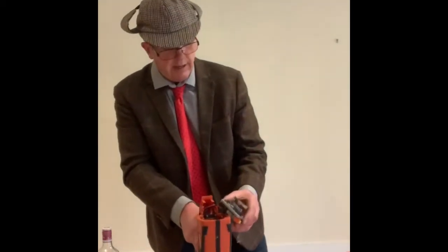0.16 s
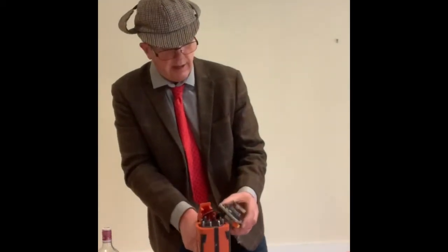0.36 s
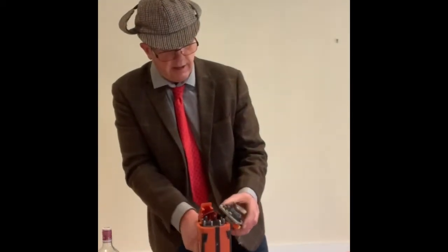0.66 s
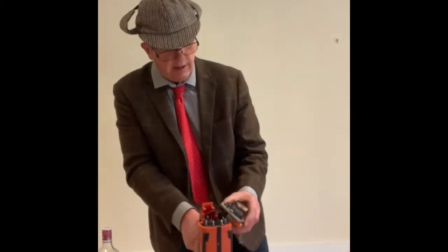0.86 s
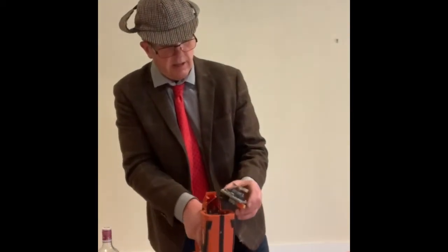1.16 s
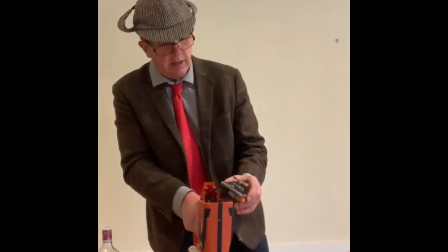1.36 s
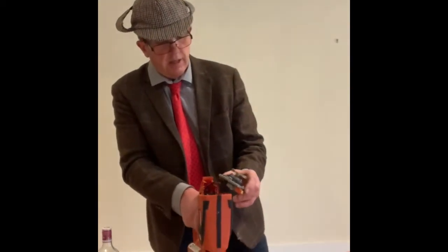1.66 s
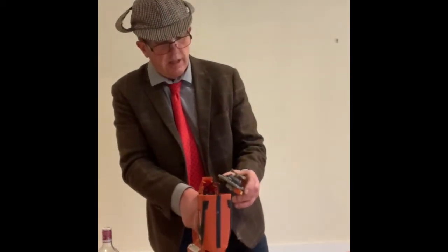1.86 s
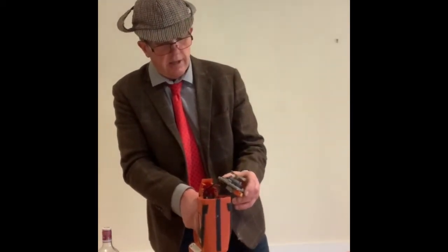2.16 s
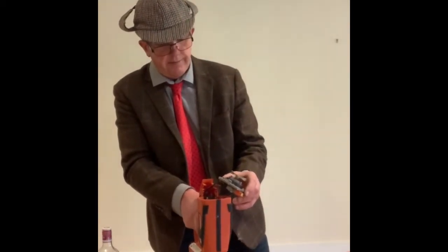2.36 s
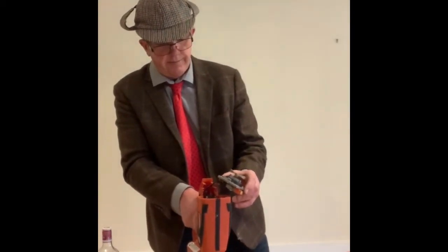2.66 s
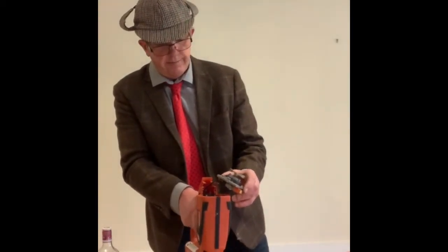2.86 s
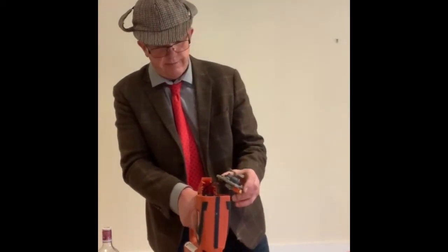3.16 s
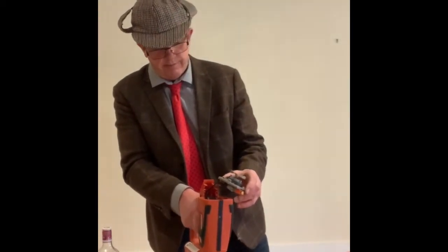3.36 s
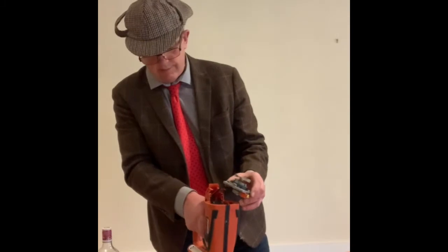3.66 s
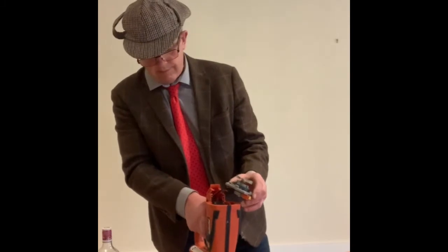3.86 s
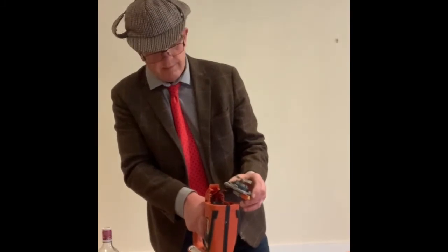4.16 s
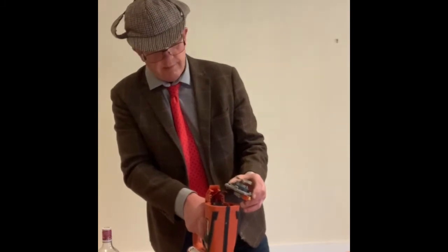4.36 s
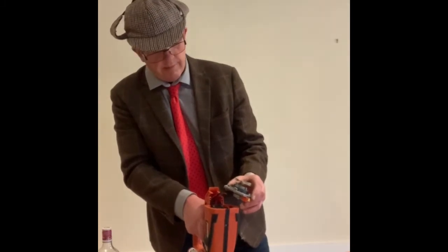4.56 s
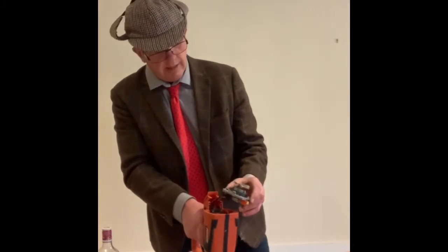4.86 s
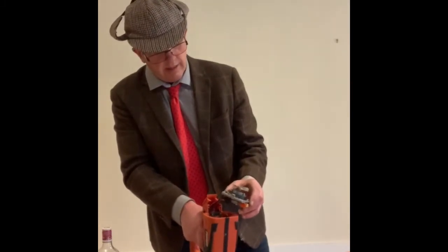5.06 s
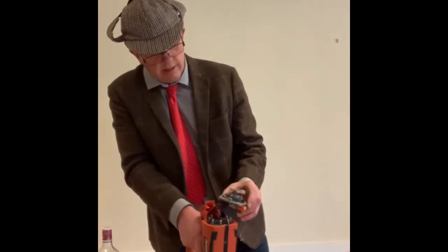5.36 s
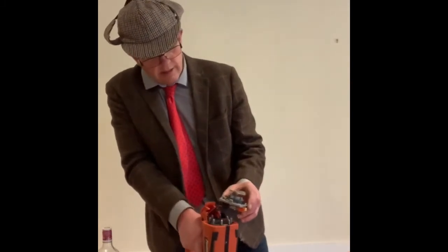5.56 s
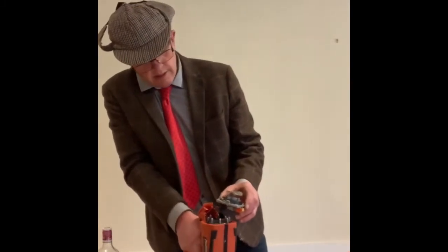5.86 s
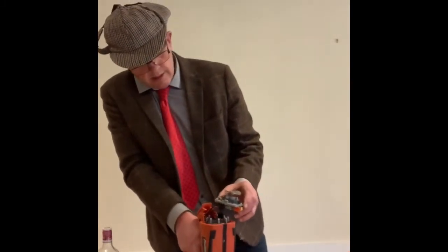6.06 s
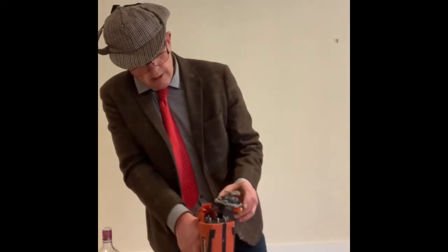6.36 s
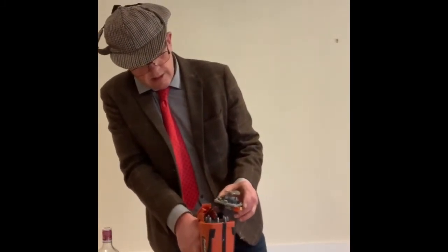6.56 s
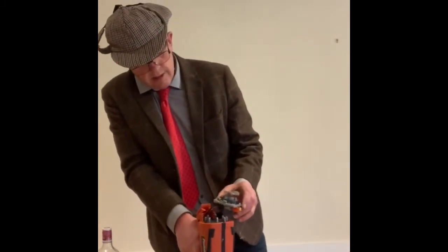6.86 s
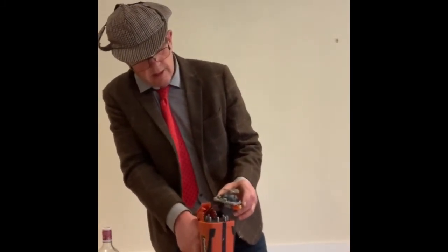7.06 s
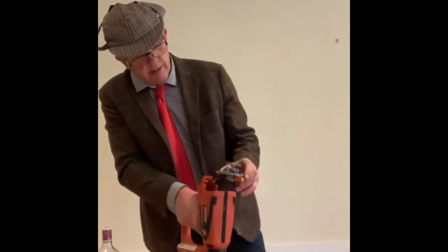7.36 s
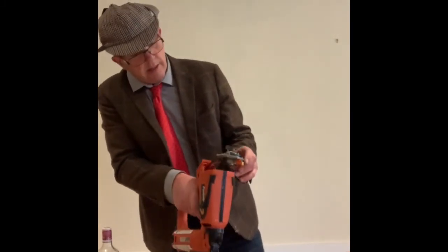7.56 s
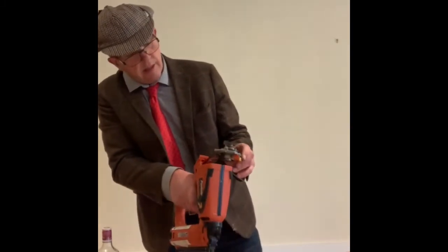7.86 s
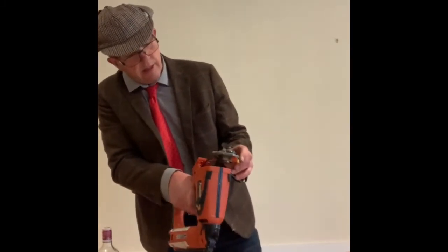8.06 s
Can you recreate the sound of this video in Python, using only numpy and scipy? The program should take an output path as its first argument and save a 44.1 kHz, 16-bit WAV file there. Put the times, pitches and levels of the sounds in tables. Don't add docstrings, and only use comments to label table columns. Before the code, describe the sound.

From the start a small four-bladed fan motor in a nail gun runs at full speed, close by in a quiet, bare room: a steady whine near 790 Hz over a faint low hum, thin higher whistles and a bright airy hiss around 4 kHz. Light handling leads to a hard latch snap and hollow table knock at 0.25 s, then soft drags; another click and knock at 1.0 s, a small click at 2.0 s. The whine wavers in strength. At 4.0 s power is cut and all tones glide down, hiss dulling and fading over 1.4 s. Clicks, scrapes and low table knocks cluster from 4.9 to 5.4 s. At 5.4 s the motor rapidly spins up to a barely lower whine. Faint drags follow, then a sharp burst of latch clicks at 7.15 s; the tone shifts colour as the tool is lifted, still running at 8 s.

```python
import sys
import numpy as np
from scipy import signal
from scipy.fft import irfft
from scipy.io import wavfile
from scipy.ndimage import uniform_filter1d

SR = 44100
rng = np.random.default_rng(int(sys.argv[2]) if len(sys.argv) > 2 else 0)


def invert_db(level):
    return 10 ** (np.asarray(level, dtype=float) / 20)


def master(y):
    cut = np.clip(np.atleast_2d(y).T, -1, 1)
    pcm = np.round(cut * 32767)
    wavfile.write(sys.argv[1], SR, pcm.astype(np.int16))


N = 361619

# frequency [Hz], level [dB].
SPREAD = [(60, -17), (300, -17), (700, -10), (1500, -7), (2600, -7), (4300, -16), (6500, -11), (9000, -14),
          (12000, -12), (15000, -8)]

FULL_SPEED_HZ = 197.3
SWITCH_OFF_S, SWITCH_ON_S = 4.0, 5.408
HOP = 256


def evened(x):
    return x / np.sqrt(np.mean(abs(x) ** 2) + 1e-20)


def read(points, hz):
    f, value = np.transpose(points)
    return np.interp(np.log(hz + 1), np.log(f + 1), value)


def add(mix, s, sound):
    part = mix[..., round(s * SR):][..., :sound.shape[-1]]
    part += sound[..., :part.shape[-1]]


def band(x, low_hz, high_hz):
    sos = signal.butter(2, (low_hz, high_hz), "band", fs=SR, output="sos")
    return signal.sosfiltfilt(sos, x)


def drift(per_s, rows):
    z = rng.standard_normal((rows, N // HOP + 402))
    b, a = signal.butter(2, np.clip(per_s * 2 * HOP / SR, .001, .9))
    return evened(signal.filtfilt(b, a, z)[:, 200:-200])


def hiss(colour_db, patchy_db, extra_db):
    frames, hz = N // HOP + 5, np.fft.rfftfreq(1024, 1 / SR)
    a, b, c, d, patches = rng.standard_normal((frames, 513, 5)).T
    patches = uniform_filter1d(patches, size=8, axis=0)
    patches = evened(uniform_filter1d(patches, size=12, axis=1))
    side = invert_db(read(SPREAD, hz) + extra_db)[:, None] * (c + 1j * d)
    z = a + 1j * b + np.array([side, -side])
    z = z * invert_db(colour_db(hz)[:, None] + patchy_db * patches)
    unit = np.sqrt(SR / 2 * 1.5 / 512)
    return unit * signal.istft(z, nperseg=1024, noverlap=768)[1][:, :N]


def echo():
    # frequency [Hz], t60 [s].
    room_t60 = [(300, 0.52), (1000, 0.26), (3000, 0.31), (8000, 0.22), (15000, 0.08)]
    onset_s = 0.0077
    hz, t, z = signal.stft(rng.standard_normal((2, SR // 2)), SR, nperseg=256)
    side = invert_db(read(SPREAD, hz) + 1.5)[:, None] * z[1]
    z = np.array([z[0] + side, z[0] - side]) * invert_db(-60 * t / read(room_t60, hz)[:, None])
    tail = signal.istft(z, SR, nperseg=256)[1]
    tail = tail * np.minimum(np.arange(tail.shape[1]) / (onset_s * SR), 1)
    return tail / np.linalg.norm(tail[0])


def quiet_room():
    # frequency [Hz], density [dB per Hz].
    hush = [(30, -103), (55, -101), (85, -103), (150, -108), (300, -112), (550, -121), (1200, -117),
            (2400, -124), (4000, -122), (6500, -127), (15500, -132)]
    return hiss(lambda hz: read(hush, hz), patchy_db=1.5, extra_db=5)


def shaft_hz(t):
    first_hz, second_hz, crawl_hz = 197.96, 196.65, 20
    coast_s, spin_up_s = .645, .11
    off_s = np.clip(t - SWITCH_OFF_S, 0, SWITCH_ON_S - SWITCH_OFF_S)
    coasting = crawl_hz + (first_hz - crawl_hz) * np.exp(-off_s / coast_s)
    on_s = np.maximum(t - SWITCH_ON_S, 0)
    return second_hz + (coasting - second_hz) * np.exp(-on_s / spin_up_s)


def casing_db(hz):
    # frequency [Hz], density [dB per Hz].
    broad = [(100, -29), (550, -26), (800, -14), (1400, -12), (2050, -15), (2800, -10), (3400, -5.5),
             (4100, -1.5), (5000, -2.5), (6500, -7), (8500, -8.5), (10500, -15), (11800, -19),
             (15700, -16.5)]
    # resonance [Hz], width [Hz], gain [dB].
    narrow = [(1130, 60, 5), (1500, 200, 5), (3300, 150, 4), (3900, 200, 4), (4350, 150, 3), (7650, 160, 7)]
    return read(broad, hz) + sum(db / (1 + (2 * (hz - f) / width) ** 2) for f, width, db in narrow)


def shaft_tones(t, slow, turn, slowing, rush_db):
    # multiple of shaft speed, level [dB].
    strong_orders = [(1, -77), (2, -89), (3, -92), (5, -73), (6, -74.5), (7, -83), (9, -80), (12, -76),
                     (15, -83), (16, -74), (17, -74), (18, -80), (19, -78), (20, -64.5), (22, -66),
                     (23, -67), (37, -75), (39, -68.5)]
    # time [s], blade tone [dB], its octave [dB].
    facing = [(0, -47, -64), (.5, -57.5, -81), (1.1, -49, -63), (1.45, -53.5, -63.5), (1.65, -54, -83),
              (2.05, -52, -69), (2.5, -54.5, -71), (2.9, -52.5, -70), (3.35, -49.5, -62),
              (3.72, -65, -64.5), (3.8, -61.5, -68), (3.99, -68.5, -66), (4.03, -50.5, -66),
              (5.78, -52, -69.5), (5.91, -61, -58), (6.15, -56, -66), (7.3, -53.5, -60.5), (8.2, -54, -88)]
    lifted_db = {1: -3, 9: 7, 12: 10, 16: 3, 17: 4}
    reseated_db = {6: 3, 16: 5}
    # time [s], lean [-1 to 1].
    blade_lean = [(3.4, -.5), (3.7, -0.057), (5.7, 0.18), (6.2, 0.28), (7.4, 0.43)]
    lift_s = 7.2, 7.9
    blade_order, octave_order = 4, 8
    blade_drop_db = 25.5
    blade_waver, other_waver = 0.17, 0.45
    buzz_hz, buzz_width_hz, buzz_db = 1120, 40, 10
    running_db = -53
    blade_turn, octave_turn, whistle_order, whistle_turn = 0.88, -0.26, 20, -.95

    speed = shaft_hz(slow)
    s, *levels = np.transpose(facing)
    blades = {}
    for order, db in zip((blade_order, octave_order), levels):
        blades[order] = np.interp(slow, s, db) + blade_drop_db * slowing
    comb = {order: -72 - .55 * abs(order - 25) for order in range(21, 46)}

    tones = np.zeros((2, N))
    for order, db in {**comb, **dict(strong_orders), **blades}.items():
        order_hz = order * speed
        a, b, c, d = drift(4.5 if order in blades else 3, rows=4)
        waver = blade_waver if order in (1, *blades) else other_waver
        common = 1 - waver + waver * (a + 1j * b)

        lean = np.interp(slow, *np.transpose(blade_lean)) if order == blade_order else -.3
        skew = octave_turn if order > blade_order else blade_turn
        if order == whistle_order:
            skew = np.where(slow < SWITCH_ON_S, whistle_turn, skew)
        side = invert_db(read(SPREAD, order_hz)) * (1j * skew + lean + .35 * (c + 1j * d))

        shift_db = casing_db(order_hz) - casing_db(order * FULL_SPEED_HZ)
        shift_db = shift_db + buzz_db / (1 + (2 * (order_hz - buzz_hz) / buzz_width_hz) ** 2)
        fading_db = rush_db - running_db + (8 + .75 * order) * slowing
        facing_db = np.interp(slow, lift_s, [0, lifted_db.get(order, 0)])
        facing_db = facing_db + reseated_db.get(order, 0) * (slow > SWITCH_ON_S)
        facing_db = facing_db + (1.5 if order > 1 else -2.5)
        level = invert_db(blades.get(order, db + shift_db + fading_db + facing_db))

        angle = order * (turn + order)
        cosine, sine = np.cos(angle), np.sin(angle)
        for channel, z in enumerate([level * (common + side), level * (common - side)]):
            tones[channel] += np.interp(t, slow, z.real) * cosine + np.interp(t, slow, z.imag) * sine

    gliding = np.interp(t, slow, np.clip(-25 * slowing, 0, 1))
    smeared = signal.oaconvolve(gliding * tones, echo(), axes=1)[:, :N]
    return (1.5 - .15 * gliding) * tones + .55 * smeared


def air_rush(t, slow, turn, slowing, rush_db):
    # from [Hz], to [Hz], gain [dB per octave lost].
    linger = [(4050, 4500, 7), (7560, 7800, 5.5)]
    throb = 1 + .08 * np.cos(turn) + .07 * np.cos(2 * turn + 1) + .07 * np.cos(3 * turn)
    gusts_db = .8 * drift(20, rows=1)[0]
    air = evened(hiss(casing_db, patchy_db=1.2, extra_db=0))
    fine = band(air, 8200, 12500)
    air = air - fine * (1 - invert_db(np.interp(t, slow, 9.7 * slowing)))
    low = band(air, 800, 2200)
    air = air + low * (invert_db(np.interp(t, slow, -5 * np.maximum(slowing, -1))) - 1)
    for low_hz, high_hz, linger_db in linger:
        whistle = band(air, low_hz, high_hz)
        gain_db = -linger_db * np.maximum(slowing, -1.5)
        air = air + whistle * (invert_db(np.interp(t, slow, gain_db)) - 1)
    return air * throb * invert_db(np.interp(t, slow, rush_db + gusts_db - .3))


def fan():
    full_db, drop_db = -52.5, 14
    powered_share = 0.71
    sputter_db = 2
    t, slow = np.arange(N) / SR, np.arange(N // HOP + 2) * HOP / SR
    wobble = 1 + .0006 * np.interp(t, slow, drift(8, rows=1)[0])
    turn = 2 * np.pi * np.cumsum(shaft_hz(t) * wobble) / SR
    slowing = np.log2(np.minimum(shaft_hz(slow) / FULL_SPEED_HZ, 1))
    share = np.interp(slow, [SWITCH_ON_S, SWITCH_ON_S + .03], [1, powered_share])
    rush_db = full_db - drop_db * share * slowing ** 2
    rush_db = rush_db + sputter_db * slowing * drift(17, rows=1)[0]
    motion = t, slow, turn, slowing, rush_db
    return shaft_tones(*motion) + air_rush(*motion)


def table_ring(best_hz, spread):
    # frequency [Hz], level [dB], t60 [s].
    modes = [(60, -19.5, .25), (85, -1.5, 0.4), (123.5, 1, 0.25), (155, 2.5, 0.19), (188, 3, 0.25),
             (208.8, -0.5, 0.32), (251, -8.5, 0.26), (283.6, 1, 0.24), (340, -9.5, 0.37), (415, -10, .18),
             (523, -25.5, .15)]
    t = np.arange(SR // 2) / SR
    hz, mode_db, t60 = np.transpose(modes)[:, :, None]
    phase, detune = rng.random((len(hz), 2, 1)).transpose(1, 0, 2)
    share = np.exp(-.5 * (np.log2(hz / best_hz) / spread) ** 2)
    wave = np.sin(2 * np.pi * hz * (.985 + 0.028 * detune) * t + 3.7 * phase)
    return (share * invert_db(mode_db - 60 * t / t60) * wave).sum(0)


def knocks():
    # time [s], level [dB], best-driven pitch [Hz], spread [octaves].
    knock_rows = [(.003, -45, 199, 0.71), (0.086, -42, 210, 0.12), (0.155, -37, 197, 0.41),
                  (0.214, -41.5, 200, 0.77), (0.2524, -19, 235, 0.49), (0.281, -28.5, 205, 0.52),
                  (.33, -36.5, 260, 0.83), (1.036, -37.5, 137, 0.19), (1.097, -50.5, 147, .61),
                  (4.946, -53.5, 169, .41), (4.963, -39.5, 155, 0.23), (5.134, -47.5, 203, 0.43),
                  (5.16, -54, 202, .65), (5.221, -28, 188, .045), (5.28, -42.5, 270, 0.68),
                  (5.335, -27, 237, 0.74), (5.388, -42, 230, 1.1), (5.439, -42.5, 210, 0.76),
                  (5.51, -54.5, 103, 0.82), (5.77, -59.5, 160.9, 0.82), (5.857, -59, 197, 0.35),
                  (6.35, -66, 173, 0.84), (7.155, -38.5, 151, 0.45), (7.218, -57, 152.1, .31)]
    # start [s], length [s], level [dB], best-driven pitch [Hz].
    drag_rows = [
        (.38, 0.2, -55.5, 119),
        (.55, .4, -67.5, 206),
        (.82, 0.2, -58.5, 179),
        (5.95, 0.52, -76.5, 120),
        (6.75, 0.33, -73.5, 90),
        (7.0, 0.13, -59.5, 168),
        (7.15, 0.15, -68, 91),
    ]
    rise_s, drag_spread = 0.0032, 0.74
    out, t = np.zeros(N), np.arange(SR // 2) / SR
    for s, db, best_hz, spread in knock_rows:
        rise = 1 - np.exp(-(t / rise_s) ** 2)
        add(out, s, invert_db(db - 3) * table_ring(best_hz, spread) * rise)
    for s, length_s, db, best_hz in drag_rows:
        ring = table_ring(best_hz, drag_spread)
        push = rng.standard_normal(len(t)) * np.sin(np.pi * np.minimum(t / length_s, 1))
        add(out, s, invert_db(db) * signal.fftconvolve(push, ring / np.linalg.norm(ring)))
    return out * invert_db([[-.4], [.4]])


def rattles(rows, length_s):
    # frequency [Hz], density [dB per Hz].
    latch = [(60, -45), (250, -14), (500, -5), (900, 0), (1600, 0), (2400, -3), (3400, 0), (4300, -1),
             (5500, -5), (8000, -5), (11000, -7), (16000, -7)]
    out, t = np.zeros((2, N)), np.arange(4096) / SR
    hz = np.fft.rfftfreq(8192, 1 / SR)
    decay = np.exp(-t / max(length_s, 5e-4))
    swell = 1 - np.exp(-t / (.0002 + 35 * length_s ** 2))
    for s, db, ring_hz, tilt_db, room_db in rows:
        ring_db = 11.4 / (1 + (np.log2((hz + 1) / ring_hz) / 0.06) ** 2)
        slope_db = tilt_db * np.log2(np.maximum(hz, 600) / 2000)
        log_gain = np.log(invert_db(read(latch, hz) + slope_db + ring_db))
        mirrored = np.r_[log_gain, log_gain[-2:0:-1]]
        colour = irfft(np.exp(np.conj(signal.hilbert(mirrored)))[:len(hz)])
        colour = colour[:1024] / np.linalg.norm(colour)
        burst = rng.standard_normal(len(t)) * decay * swell
        click = invert_db(db) * signal.fftconvolve(burst, colour)[None]
        add(out, s, click)
        add(out, s, invert_db(room_db) * signal.fftconvolve(click, echo(), axes=1))
    return out


def scrapes():
    # time [s], level [dB], ringing part [Hz].
    scrape_rows = [
        (.045, -46, 1720),
        (.196, -39, 1270),
        (5.247, -54, 1190),
        (5.277, -46.5, 4540),
        (5.379, -60, 1002),
        (5.439, -57, 1160),
        (6.97, -59, 1000),
        (7.111, -41, 1640),
    ]
    tilt_db, room_db = -3.5, -2
    return rattles([(*row, tilt_db, room_db) for row in scrape_rows], length_s=.018)


def clicks():
    # time [s], level [dB], ringing part [Hz], tilt [dB per octave], room [dB].
    click_rows = [(0.2425, -19.5, 3460, 0.5, -5), (.251, -23, 1543, -3, -6), (.985, -40.5, 830, -4.5, -4),
                  (1.016, -45.5, 4200, -0.5, 8), (1.0348, -24.5, 9150, -1, -6.5),
                  (1.043, -43, 4330, 15, -9), (1.052, -28, 845, 0, -6), (1.09, -60, 1530, -18, -8),
                  (1.9896, -37, 2090, 0, -5), (4.944, -37, 1730, 3.5, 4.5), (4.95, -61, 7000, 1, 5),
                  (5.1228, -49, 3580, -2, -11), (5.133, -45, 880, -4, -6), (5.164, -48, 890, -1.5, -7.5),
                  (5.202, -44, 3650, -3, -5), (5.211, -40.5, 884, -5.5, .6), (5.318, -38.5, 3720, -8.5, 5),
                  (5.3316, -30, 3080, -2, -8), (5.334, -27, 776, -7, -4.5), (7.1512, -26.5, 862, -3, -6.5),
                  (7.1554, -20.5, 4500, 0, -6), (7.1619, -28.5, 3200, -3.5, -5), (7.166, -25.5, 1610, 4, 1)]
    return rattles(click_rows, length_s=0.0044)


def scene():
    return quiet_room() + fan() + knocks() + scrapes() + clicks()


def joint_stereo(x):
    # frequency [Hz], ratio [dB].
    floor_db = [(2500, -22.5), (3800, -12.5), (5200, -10.5), (8500, -4.5), (11500, -2), (14000, -14)]
    hz, _, z = signal.stft([x[0] + x[1], x[0] - x[1]], SR, nperseg=1024, noverlap=768)
    energy = uniform_filter1d(abs(z) ** 2, size=9, axis=1)
    energy = uniform_filter1d(energy, size=5, axis=2)
    bright = (abs(z[:, 48:]) ** 2).sum((0, 1))
    attack = bright > 3 * np.roll(uniform_filter1d(bright, size=7), 6)
    kept = (energy > invert_db(2 * read(floor_db, hz))[:, None] * energy[::-1]) | attack
    total, difference = signal.istft(z * kept, SR, nperseg=1024, noverlap=768)[1][:, :N] / 2
    return np.array([total + difference, total - difference])


def band_limit(x):
    return signal.sosfilt(signal.butter(12, 17110, fs=SR, output="sos"), x)


def record(dry):
    left_lag, low_hz, high_hz = 5, 34, 15780
    late = np.array([np.roll(dry[0], left_lag), dry[1]])
    late = signal.sosfilt(signal.butter(4, low_hz, "high", fs=SR, output="sos"), late)
    edge = signal.firwin(511, high_hz, window=("kaiser", 9), fs=SR)
    mix = joint_stereo(signal.oaconvolve(late, edge[None], "same"))
    return band_limit(mix)


dry = scene()
out = record(dry)
master(out)
```